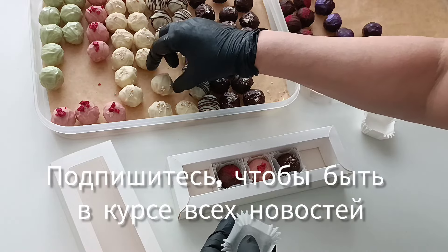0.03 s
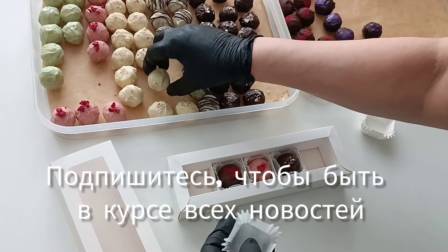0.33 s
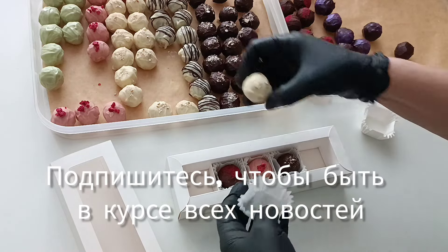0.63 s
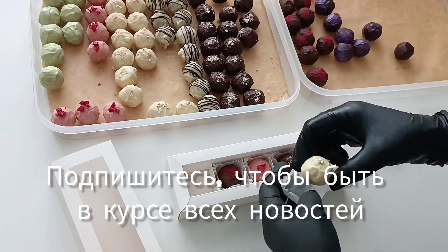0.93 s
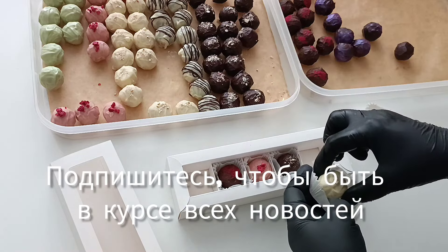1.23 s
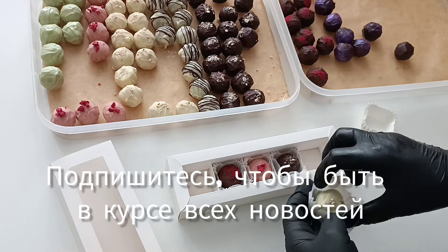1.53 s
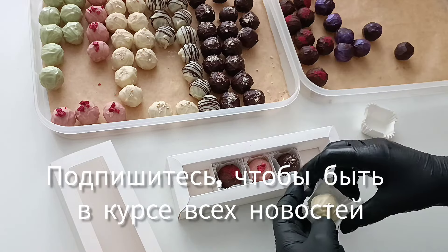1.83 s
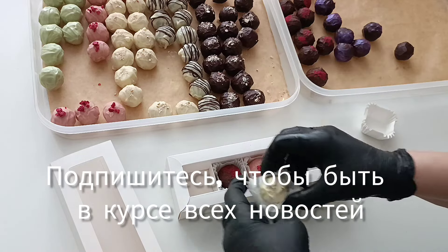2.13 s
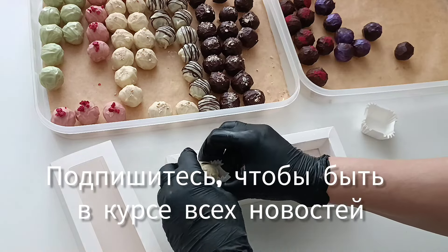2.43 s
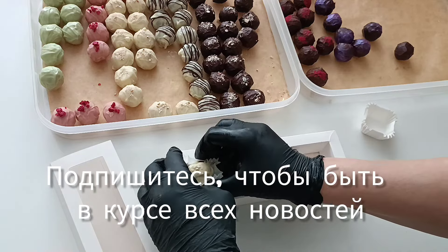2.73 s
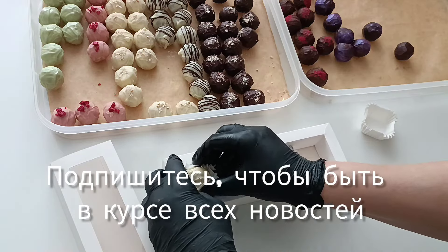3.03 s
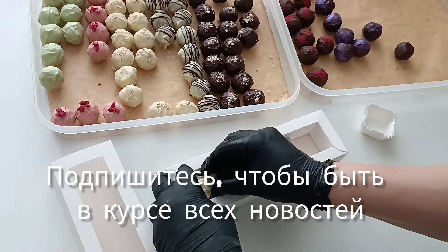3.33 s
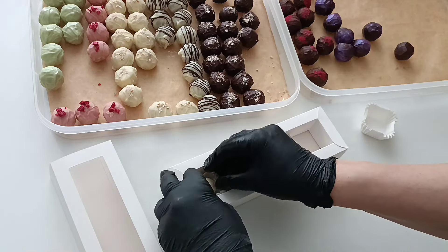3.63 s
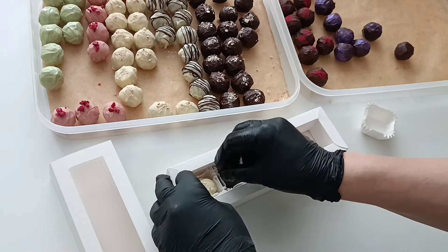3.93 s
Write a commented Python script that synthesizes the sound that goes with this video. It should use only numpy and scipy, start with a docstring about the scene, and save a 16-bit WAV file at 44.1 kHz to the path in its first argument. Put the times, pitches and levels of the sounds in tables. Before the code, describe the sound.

Thin paper crackles and rustles as gloved hands handle a candy cup and fit it into a card box. The close crinkling starts sparsely, then comes in irregular clusters, with one soft low bump early on, over quiet room noise.

```python
"""In a small, quiet room, close to a phone, gloved hands open a pleated paper candy cup, seat a sweet
in it and press it into a card gift box. Pleats buckle in sharp snaps over a rustle of tiny creases;
both drive the resonances of the box and leave a short reverberant tail. Sliding paper sings briefly
by friction. One low rumble, probably the table being nudged, rises over the steady murmur of the air."""
import sys
import numpy as np
from scipy import signal
from scipy.fft import rfft, irfft
from scipy.io import wavfile
from scipy.ndimage import uniform_filter1d, map_coordinates

SR = 44100
rng = np.random.default_rng(int(sys.argv[2]) if len(sys.argv) > 2 else 0)


def materialize(psi):
    """Save the field psi as 16-bit PCM at rate SR to the path in sys.argv[1].

    A 1-D psi becomes a single channel; in a 2-D psi each row is a channel.
    """
    bounded = np.clip(np.atleast_2d(psi).T, -1, 1)
    quanta = np.round(bounded * 32767).astype(np.int16)
    wavfile.write(sys.argv[1], SR, quanta)


N = 176400

# The paper's four bands: hollow, body, crisp, fizz. Each row: low edge in Hz, high edge in Hz.
PAPER_BANDS = [(400, 1100), (1100, 2300), (2300, 7500), (7500, 16800)]
# Tone colour of the crackling paper as the phone's microphone picks it up.
# Each row: frequency in Hz, gain in dB.
PAPER_COLOUR = [(380, -41.5), (500, -14.5), (620, -18.5), (780, -3), (970, -6), (1180, -6), (1400, -5),
                (1830, -2.5), (2600, -3.5), (3400, 1), (4350, -0.5), (5600, -1), (6700, -2), (8100, -16),
                (9200, -18), (12000, -27.5), (13800, -31), (15300, -8.5), (16500, -41.5)]
# Buckling pleats. Each row: start in seconds, pitch in Hz, then hollow, body, crisp and fizz levels
# in dB before the band's gain.
PLEAT_SNAPS = [(0.3782, 5170, -74, -68, -60, -55), (0.7264, 3430, -73.5, -61, -63.5, -81),
               (0.805, 2820, -87, -76, -66.5, -82), (0.8949, 1370, -59.5, -51.5, -80, -86.0),
               (1.004, 6120, -70, -61, -46, -49), (1.0841, 1290, -48.5, -41.5, -39, -56),
               (1.1298, 3040, -37.5, -30.5, -31.5, -40), (1.2603, 3120, -48.5, -60, -29.5, -44),
               (1.2809, 5430, -59.0, -38, -33, -34.5), (1.2933, 4220, -38, -30, -28.5, -37.5),
               (1.3164, 3250, -46.5, -34, -26.5, -41), (1.381, 5400, -61, -66, -36, -37.5),
               (1.4404, 1420, -48.5, -33.5, -39.5, -49), (1.561, 5530, -71, -72, -42, -55.0),
               (1.5963, 6600, -59, -44, -37, -42), (1.603, 4800, -52, -59, -38, -49),
               (1.6086, 1466, -41, -32, -33, -39), (1.6648, 1440, -47.5, -33.5, -42, -47),
               (1.6726, 5500, -67, -44.5, -31.5, -42), (1.687, 4600, -63, -38, -49, -39),
               (1.709, 6000, -62, -47, -30.5, -35), (1.8122, 4830, -48.5, -35.5, -25, -33.5),
               (1.888, 7140, -78, -52, -37.5, -44), (1.95, 1500, -52, -34, -48, -72),
               (1.995, 1520, -74.0, -41, -46, -72), (2.001, 1570, -55, -28, -36.5, -55.0),
               (2.0266, 1414, -53.5, -24.5, -29.5, -42), (2.0401, 4560, -56, -32, -32.5, -38),
               (2.147, 1500, -78, -36.5, -34.5, -52.5), (2.2644, 3160, -58, -41, -29, -48),
               (2.34, 2000, -58, -35, -38, -40), (2.3737, 5200, -59, -43, -35, -47),
               (2.3953, 6840, -72, -56, -39, -37), (2.4471, 1880, -50, -31.5, -30.5, -37),
               (2.4901, 1160, -44.5, -37, -46, -42), (2.5151, 1900, -66, -35, -57, -39),
               (2.5854, 1160, -50, -36.5, -54, -53), (2.706, 7530, -56, -39, -29, -32),
               (2.7326, 2100, -67, -36.5, -41, -42), (2.7517, 4300, -55, -44.5, -38.5, -45),
               (2.8024, 6700, -68, -69, -42, -50.5), (2.8319, 6640, -56, -50, -32, -44),
               (2.9786, 4800, -58, -67, -39.5, -50.5), (3.0408, 5950, -70, -51, -57, -45.5),
               (3.0761, 1200, -44.5, -35.5, -37, -37.5), (3.0992, 5300, -43.5, -32, -34, -37),
               (3.1408, 1260, -39, -31.5, -39.5, -34.5), (3.1789, 6200, -67, -46, -31, -38.5),
               (3.2085, 5780, -38, -55, -38, -40), (3.217, 776, -35, -39, -37.5, -45),
               (3.2603, 2020, -33.5, -23.5, -43, -52), (3.3042, 4850, -40, -35.5, -29.5, -55),
               (3.51, 4510, -46.5, -53, -29, -33), (3.5134, 5500, -44, -52, -31, -40.5),
               (3.6368, 5000, -55.5, -44, -34, -66), (3.688, 2800, -71, -76, -45, -66.0),
               (3.7539, 4700, -55, -59, -36, -54), (3.8102, 5670, -49.5, -44, -31.5, -39.5),
               (3.8534, 4730, -55, -62, -31, -43.5), (3.888, 3350, -72, -61, -35.5, -43)]
# Damping of a snap. Each row, one per band: time constant in seconds, gain in dB.
SNAP_DECAY = [(0.0033, -2.5), (0.0023, -4), (0.0015, -1), (0.0011, 1)]
# Rustle envelope. Each row: time in seconds, body and crisp levels in dB before the band's gain.
RUSTLE_LEVELS = [(0.5, -71, -85), (0.775, -81, -77), (0.895, -67, -86), (0.997, -81, -81),
                 (1.008, -73, -57.5), (1.072, -59, -57.5), (1.085, -38, -45.5), (1.122, -55, -49.5),
                 (1.131, -48, -37.5), (1.182, -46, -46.5), (1.254, -45.5, -53.5), (1.284, -36, -41.5),
                 (1.41, -49, -46.5), (1.446, -42.5, -43.5), (1.547, -63, -58), (1.601, -41.5, -43),
                 (1.643, -47, -45), (1.661, -40, -44), (1.703, -45.5, -40.5), (1.81, -77, -62.5),
                 (1.816, -55, -43), (1.946, -56, -54.5), (1.955, -46, -47), (2.024, -51, -55.5),
                 (2.032, -46, -40), (2.104, -52, -52), (2.15, -56, -57.5), (2.205, -76, -63),
                 (2.25, -45.5, -40.5), (2.332, -40, -44), (2.416, -49, -50), (2.451, -39, -42),
                 (2.577, -48, -48.5), (2.589, -35.5, -41.5), (2.613, -54, -59), (2.649, -53, -56.5),
                 (2.703, -50.5, -44.5), (2.781, -57, -53.5), (2.9, -50.5, -58), (2.942, -63.5, -73),
                 (2.954, -52.5, -57), (3.038, -55.5, -46), (3.14, -42, -41.5), (3.236, -49.5, -47.5),
                 (3.266, -36.5, -37), (3.349, -45.5, -44), (3.403, -45, -47), (3.494, -64, -64.5),
                 (3.511, -39.5, -41.5), (3.607, -49.5, -52), (3.66, -57, -66.5), (3.746, -78, -74),
                 (3.757, -45.5, -41.5), (3.9, -53.5, -57.5), (3.984, -94, -100.5)]
# Rustle envelope of the hollow band. Each row: time in seconds, level in dB before the band's gain.
HOLLOW_LEVELS = [(0.95, -85), (1.129, -63), (1.453, -55), (1.542, -71), (1.614, -59), (1.662, -51),
                 (1.79, -90), (1.83, -73), (1.91, -75), (2.033, -63), (2.17, -93), (2.55, -51),
                 (2.656, -65), (2.95, -60), (3.1, -50), (3.249, -53), (3.263, -34.5), (3.48, -60),
                 (3.512, -58), (3.7, -86), (3.817, -53), (3.985, -98)]
# Grain of the rustle. Each row, one per band: gain in dB, scatter of crease sizes in dB.
CREASE_GRAIN = [(-8, 3), (-4.5, 2.0), (-1.5, 2.5), (-6, 3.5)]
# Ticks of small pleats. Each entry, one per band: level in dB relative to the creases.
TICK_DB = [-12, -9, -3.5, -0.5]
# Stereo width. Each entry, one per band: share of rustle power that differs between microphone ports.
PORT_SPREAD = [0.073, 0.88, 0.97, 0.62]
# Stereo balance. Each entry, one per band: left minus right in dB.
BALANCE_DB = [-6.5, -1.5, -1, -2.5]
# Paper sliding on glove or card. Each row: start in seconds, length in seconds, lower resonance in Hz,
# its level in dB, upper resonance in Hz, its level in dB.
PAPER_SLIDES = [(1, 0.014, 1480, -56, 2670, -51), (1.826, 0.067, 4430, -48.5, 5730, -57),
                (2.25, 0.073, 540, -57.5, 1704, -44), (2.845, 0.08, 1200, -68, 2400, -57),
                (2.87, 0.04, 500, -56.5, 795, -50.5), (2.947, 0.084, 845, -57.5, 1263, -52)]
# Modes of the card box. Each row: frequency in Hz, time to decay 60 dB in seconds, coupling in dB.
BOX_MODES = [(730, 0.22, -4), (1212, 0.045, 4.5), (1883, 0.037, -2)]
# Envelope of the rumble. Each row: time in seconds, relative level in dB.
RUMBLE_LEVELS = [(1.114, -50), (1.133, -38), (1.16, -36.5), (1.18, -36), (1.205, -40), (1.24, -43.5),
                 (1.32, -58), (1.364, -59), (1.40, -96)]
# Low resonances of the room, rung by a dull bump. Each row: frequency in Hz, gain in dB.
ROOM_RESONANCES = [(30, -31), (52, -51), (68, -8.5), (108, -0.5), (128, -3.5), (148, 0.5), (180, -5),
                   (240, -6.5), (330, -17), (520, -18), (1200, -58)]
# Reverberation. Each row, one per band: time to decay 60 dB in seconds, dB relative to direct sound.
ROOM_TAILS = [(0.048, 1), (0.1, -14), (0.1, -10.5), (0.065, -10.5)]
# Spectrum of the room noise. Each row: frequency in Hz, relative density in dB.
AIR_COLOUR = [(25, -15.5), (65, -14.5), (100, 4), (125, -5), (152, 7), (185, -7.5), (300, 0), (400, -8),
              (1500, -20), (6500, -36.5), (13500, -49), (15300, -28), (16500, -40)]

CREASES_PER_S = 6000
SIDE = np.array([[1], [-1]])  # adds to the left, subtracts from the right


def paper_cup():
    """Source and filter: snaps and rustle excite the paper band by band, a little to the right."""
    creases = rng.random(N) < CREASES_PER_S / SR
    sizes = np.minimum(rng.exponential(size=N), 5)
    flutter_db = 2 * wander(per_s=140)
    ticks = tick_envelope()
    crisp_db = envelope_db(RUSTLE_LEVELS, column=2)
    pivot_db = -37.5
    fizz_db = pivot_db + 1.23 * (crisp_db - pivot_db)  # fizz grows faster than the crisp band
    levels_db = [envelope_db(HOLLOW_LEVELS), envelope_db(RUSTLE_LEVELS), crisp_db, fizz_db]
    out = 0
    for band, edges_hz in enumerate(PAPER_BANDS):
        paper = impulse_response(PAPER_COLOUR, edges_hz)
        direct = pleat_snaps(band, paper)
        direct += rustle(band, paper, creases, sizes, ticks, levels_db[band] + flutter_db)
        out = out + reverberate(direct, band) * undb(SIDE * BALANCE_DB[band] / 2)
    return out


def pleat_snaps(band, paper, rise_s=0.00075, decay_cycles=4, note_db=2.5, size=2048):
    """Buckling: each pleat releases its elastic energy as a noise burst and a damped note."""
    out, t = np.zeros((2, N + size)), np.arange(size) / SR
    decay_s, gain_db = SNAP_DECAY[band]
    low_hz, high_hz = PAPER_BANDS[band]
    rise = 1 - np.exp(-t / rise_s)
    rms_window_s = 0.0052  # a snap's level is its energy spread over this time
    for start_s, hz, *levels_db in PLEAT_SNAPS:
        noise = rng.standard_normal((3, size))
        release = two_ports(noise, PORT_SPREAD[band] / 2) * rise * np.exp(-t / decay_s)
        burst = unit_energy(convolve(release, paper))
        if low_hz <= hz < high_hz:
            port_phase = 0.5 * noise[1:, -1:]
            note = np.sin(2 * np.pi * hz * t + port_phase) * rise * np.exp(-t * hz / decay_cycles)
            burst = unit_energy(burst + undb(note_db) * unit_energy(note))
        start = int(start_s * SR)
        out[:, start:start + size] += burst * np.sqrt(rms_window_s * SR) * undb(levels_db[band] + gain_db)
    return out[:, :N]


def rustle(band, paper, creases, sizes, ticks, level_db):
    """Shot noise: thousands of tiny creases and slips overlap, a few much larger than the rest."""
    gain_db, scatter_db = CREASE_GRAIN[band]
    noise = two_ports(rng.standard_normal((3, N)), PORT_SPREAD[band])
    strength = unit_rms(creases * undb(scatter_db * sizes)) + undb(TICK_DB[band]) * ticks
    ringing = fold_resonances(convolve(noise * strength, paper))
    return unit_rms(ringing) * undb(level_db + gain_db)


def tick_envelope(per_s=110, decay_s=0.0005):
    """A Poisson process: small pleats tick at random, each dying away exponentially."""
    onsets = rng.random(N) < per_s / SR
    return unit_rms(signal.lfilter([1], [1, -np.exp(-1 / (decay_s * SR))], onsets))


def fold_resonances(x, depth_db=4.5, width_hz=230, hold_s=0.04, size=512):
    """Shape sets resonance: narrow peaks come and go at random as the fingers reshape the folds."""
    spectra = signal.stft(x, nperseg=size)[2]
    ripple = rng.standard_normal(spectra.shape[1:])
    ripple = uniform_filter1d(ripple, round(width_hz * size / SR), axis=0)
    ripple = uniform_filter1d(ripple, round(hold_s * 2 * SR / size), axis=1)
    gain = undb(depth_db * np.clip(unit_rms(ripple), -2, 2))
    return signal.istft(spectra * gain, nperseg=size)[1][:, :N]


def paper_slides(relative_width=0.12, attack_s=0.0073, release_s=0.0068, size=SR // 2):
    """Stick-slip friction: tiny slips excite two resonances while the cup drags over glove or card."""
    out, t = np.zeros((2, N + size)), np.arange(size) / SR
    for start_s, length_s, low_hz, low_db, high_hz, high_db in PAPER_SLIDES:
        noise = two_ports(rng.standard_normal((3, size)), PORT_SPREAD[1])
        slips = noise * (rng.random(size) < CREASES_PER_S / SR)
        motion = np.minimum(t / attack_s, 1) * np.exp(-np.maximum(t - length_s, 0) / release_s)
        start = int(start_s * SR)
        for hz, db in (low_hz, low_db), (high_hz, high_db):
            b, a = signal.iirpeak(hz, 1 / relative_width, fs=SR)
            ring = signal.lfilter(b, a, signal.lfilter(b, a, slips)) * motion
            out[:, start:start + size] += unit_energy(ring) * np.linalg.norm(motion) * undb(db)
    return out[:, :N]


def card_box(paper):
    """Forced vibration: the paper drives the damped modes of the box, which add to its sound."""
    out = paper
    for hz, t60, coupling_db in BOX_MODES:
        pole = np.exp((2j * np.pi * hz - np.log(1000) / t60) / SR)
        out = out + undb(coupling_db) * signal.lfilter([1 - abs(pole)], [1, -pole], paper).real
    return out


def bump_rumble(judders_per_s=470, gain_db=1.5, side_db=-14.5):
    """Impulse excitation: a dull bump, probably on the table, rings the low resonances of the room."""
    judder = (rng.random(N) < judders_per_s / SR) * rng.choice([-1, 1], (2, N))
    body = convolve(judder, impulse_response(ROOM_RESONANCES, size=8192))
    running_rms = np.sqrt(uniform_filter1d(body ** 2, SR // 20) + 1e-12)
    mid, side = body / running_rms
    return (mid + undb(side_db) * side * SIDE) * undb(envelope_db(RUMBLE_LEVELS) + gain_db)


def reverberate(direct, band, delay_s=0.00073):
    """Diffuse reflection: the room adds a short exponential tail, different at each port."""
    t60, wet_db = ROOM_TAILS[band]
    t = np.arange(SR // 2) / SR
    onset = np.clip(t / delay_s - 1, 0, 1)
    tail = rng.standard_normal((2, len(t))) * np.exp(-np.log(1000) * t / t60) * onset
    return direct + undb(wet_db) * convolve(direct, unit_rms(tail) / np.sqrt(len(t)))


def room_noise(level_db=-65, wide_above_hz=730, treble_side_db=-2.5, full_side_db=-14):
    """Spatial coherence: the air's low murmur is alike at both ports in the bass, wide in the treble."""
    mid, side = convolve(rng.standard_normal((2, N)), impulse_response(AIR_COLOUR, size=8192))
    treble = signal.sosfilt(signal.butter(1, wide_above_hz, "high", fs=SR, output="sos"), side)
    side = undb(treble_side_db) * treble + undb(full_side_db) * side
    return unit_rms(mid + side * SIDE) * undb(level_db)


def impulse_response(colour, edges_hz=None, size=2048):
    """Minimum phase: folding the cepstrum turns a spectrum, whole or one band, into a causal response."""
    hz, points = np.fft.rfftfreq(size, 1 / SR) + 1, np.array(colour)
    gain = undb(np.interp(np.log(hz), np.log(points[:, 0]), points[:, 1]))
    if edges_hz:
        low_hz, high_hz = edges_hz
        gain = gain / np.sqrt((1 + (low_hz / hz) ** 14) * (1 + (hz / high_hz) ** 14))
    cepstrum = irfft(np.log(gain + 1e-5))
    cepstrum[1:size // 2] *= 2
    cepstrum[size // 2 + 1:] = 0
    return irfft(np.exp(rfft(cepstrum)))


def convolve(x, response):
    """Linear filtering of each channel by an impulse response."""
    return signal.fftconvolve(np.atleast_2d(x), np.atleast_2d(response), axes=1)[:, :x.shape[-1]]


def two_ports(noise, spread):
    """Partial coherence from three noises: one shared, one for each port."""
    return np.sqrt(1 - spread) * noise[0] + np.sqrt(spread) * noise[1:]


def envelope_db(rows, column=1):
    """Linear interpolation of levels in time, silent before the first row."""
    rows = np.array(rows)
    return np.interp(np.arange(N) / SR, rows[:, 0], rows[:, column], left=-120)


def wander(per_s):
    """Smoothed random steps with a spread near 1."""
    hold = int(SR / per_s)
    return uniform_filter1d(np.repeat(rng.standard_normal(N // hold + 1), hold), hold)[:N]


def undb(db):
    """Decibels to amplitude ratio."""
    return 10 ** (np.asarray(db) / 20)


def unit_rms(x):
    """Normalisation to an rms of 1."""
    return x / np.sqrt(np.mean(x ** 2) + 1e-20)


def unit_energy(x):
    """Normalisation of each channel to an energy of 1."""
    return x / np.sqrt(np.sum(x ** 2, axis=-1, keepdims=True) + 1e-20)


def scene(right_lag_s=0.00007):
    """Superposition of paper, box, bump and air; paper and box reach the right port slightly later."""
    left, right = card_box(paper_cup()) + paper_slides()
    right = map_coordinates(right, [np.arange(N) - right_lag_s * SR], order=5)
    return np.array([left, right]) + bump_rumble() + room_noise()


def record(dry, cutoff_hz=16400):
    """Band limiting: the phone's steep low-pass filter removes the highest treble."""
    return signal.sosfilt(signal.ellip(8, .2, 70, cutoff_hz, fs=SR, output="sos"), dry)


dry = scene()
out = record(dry)
materialize(out)
```